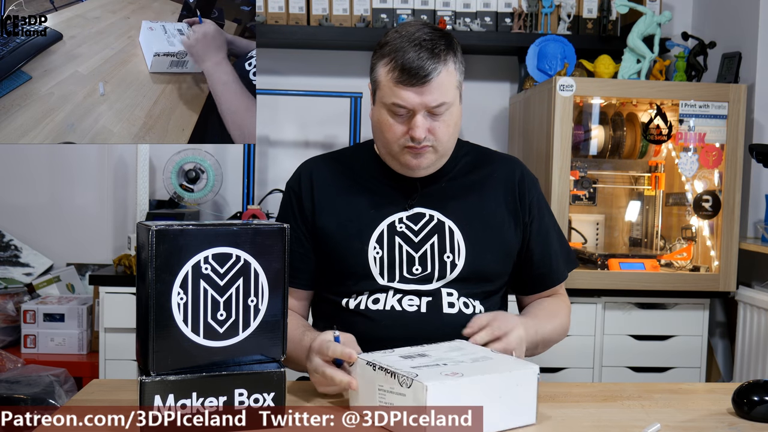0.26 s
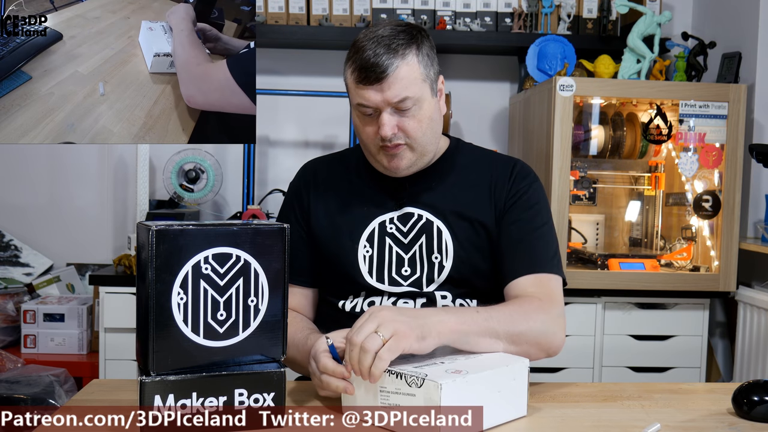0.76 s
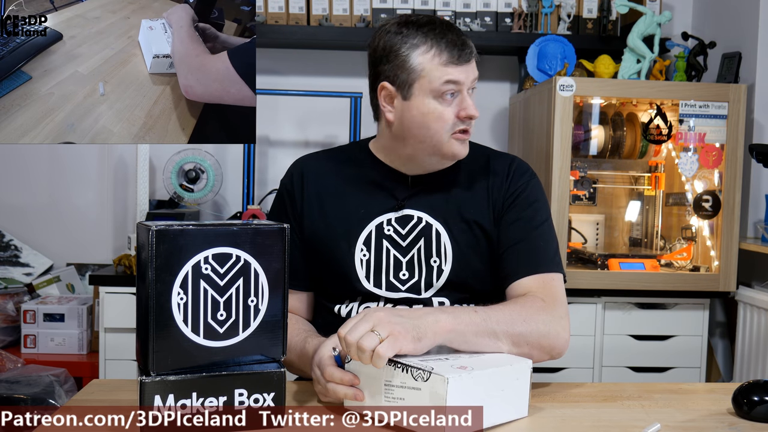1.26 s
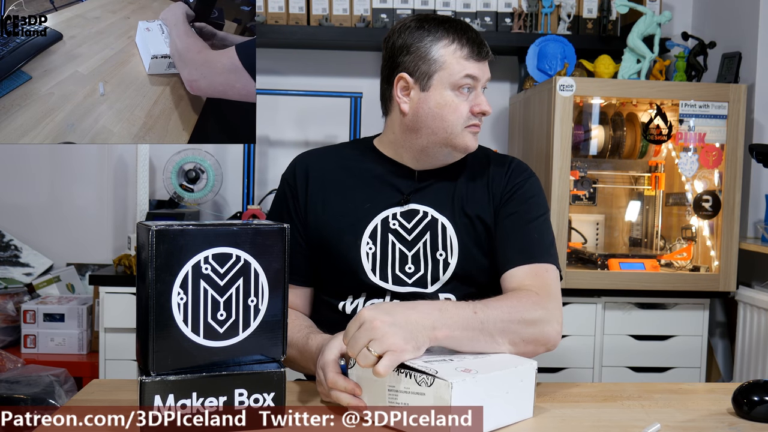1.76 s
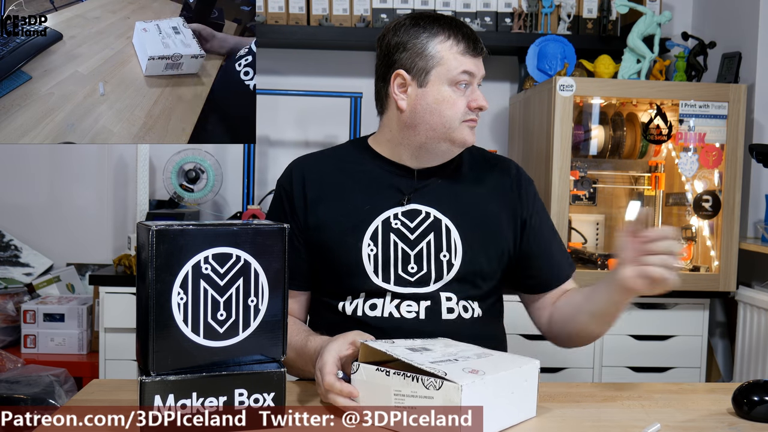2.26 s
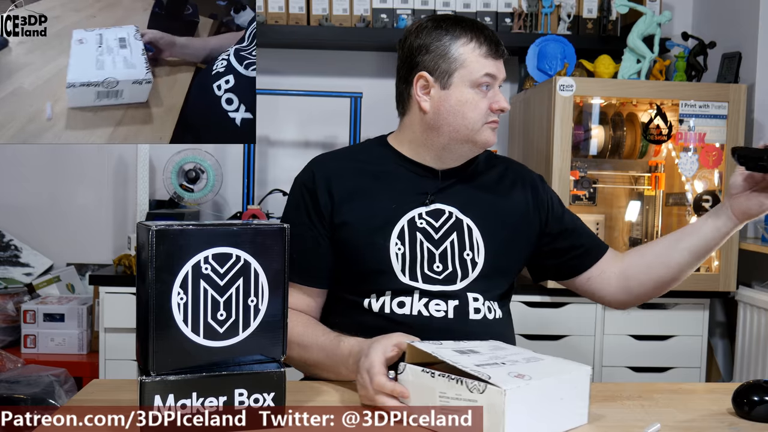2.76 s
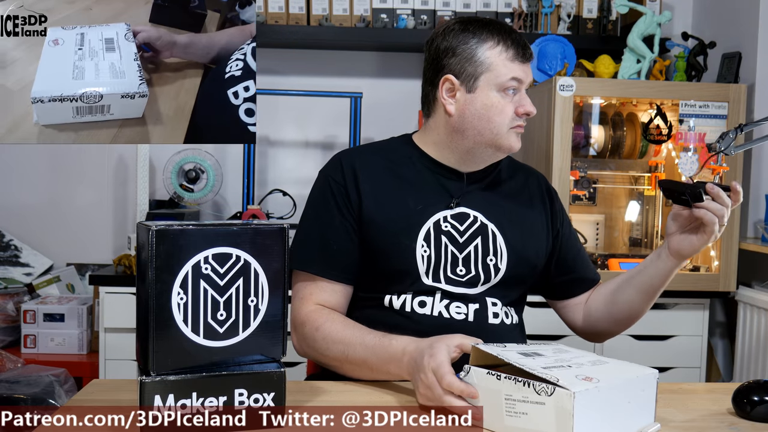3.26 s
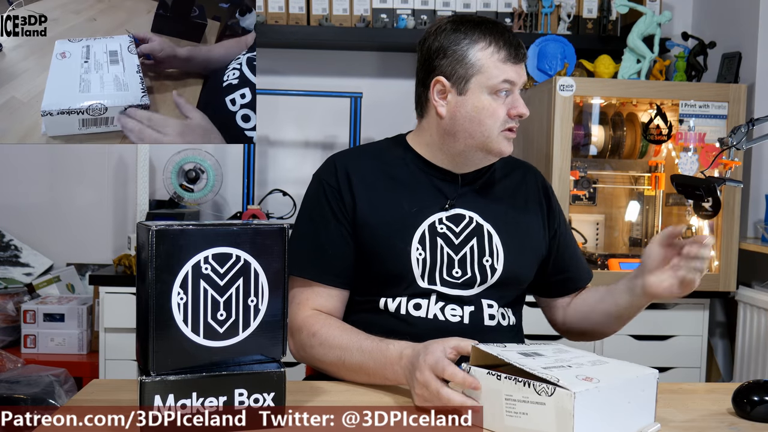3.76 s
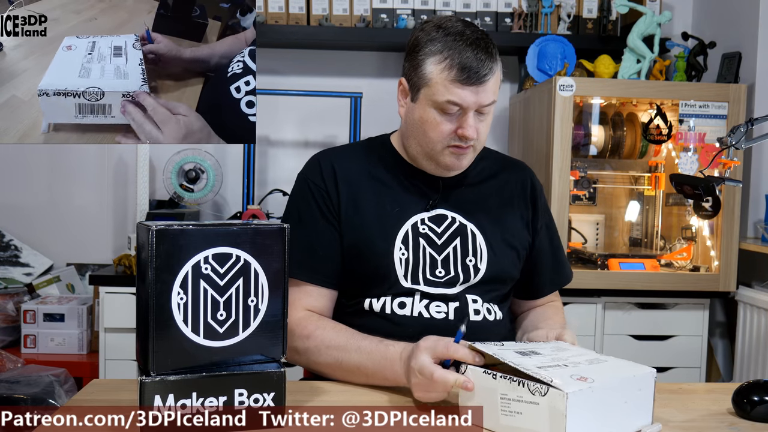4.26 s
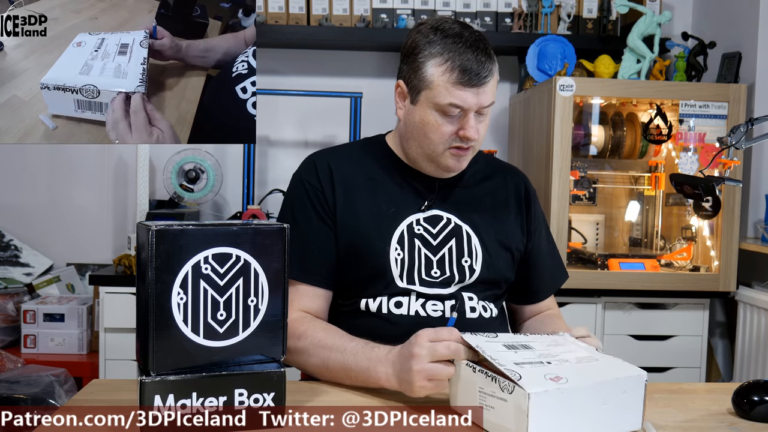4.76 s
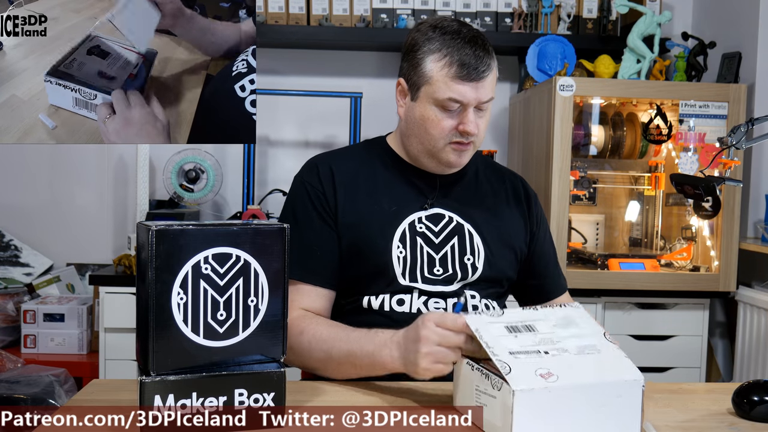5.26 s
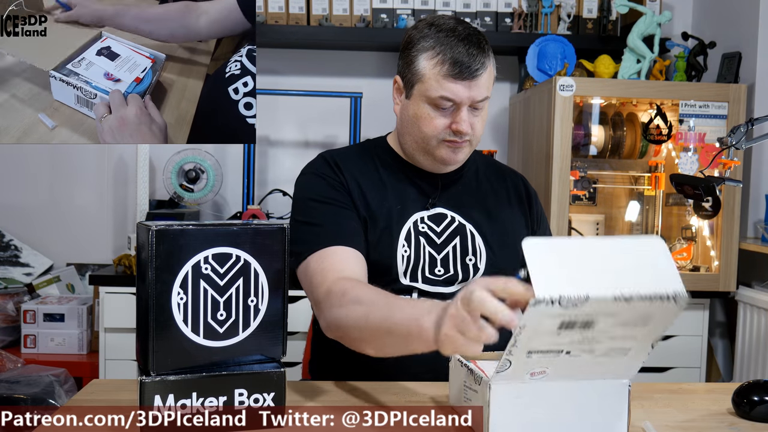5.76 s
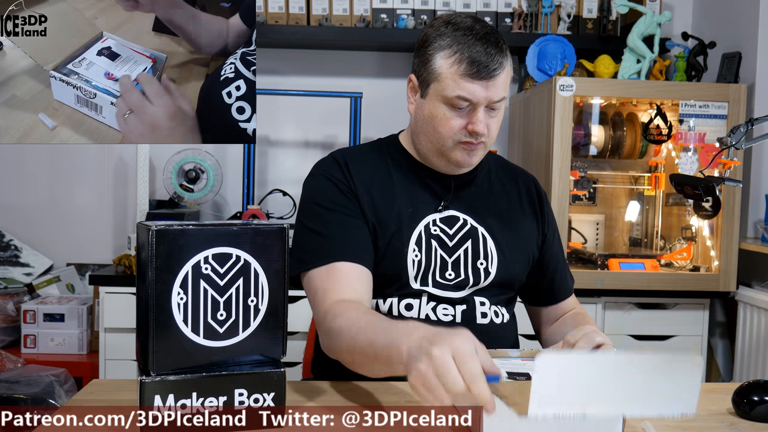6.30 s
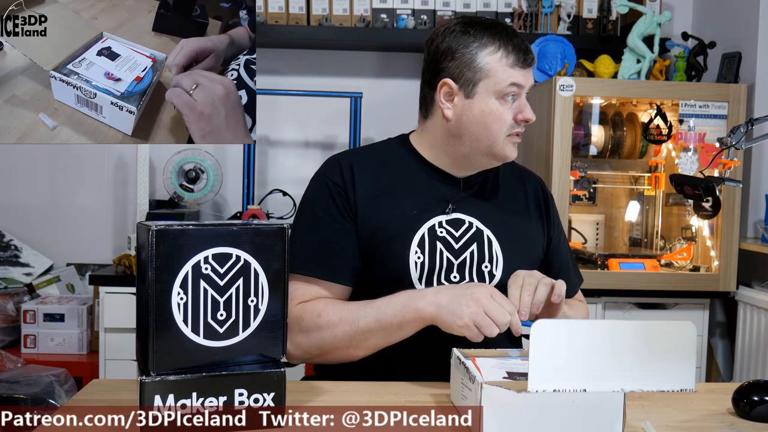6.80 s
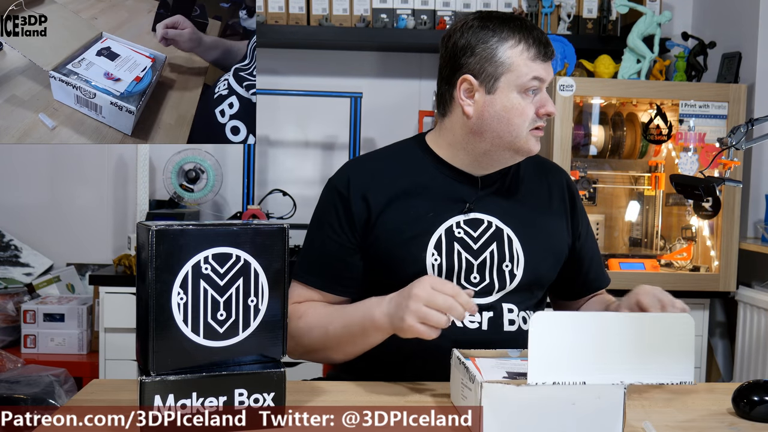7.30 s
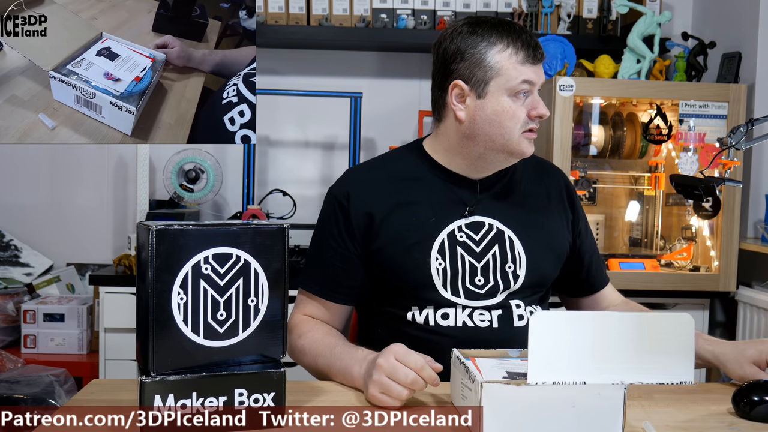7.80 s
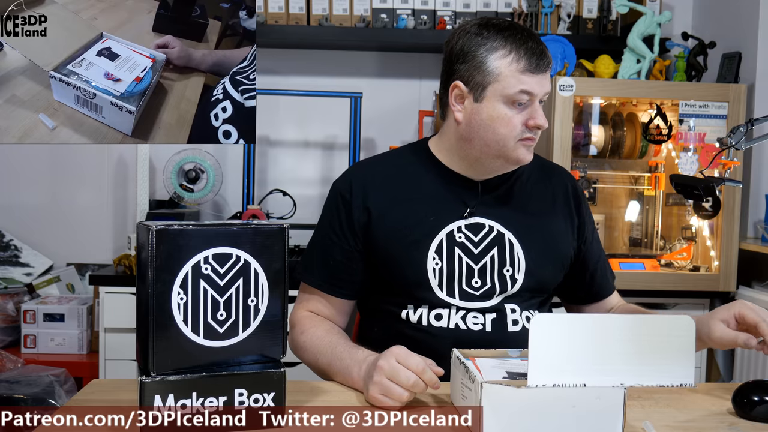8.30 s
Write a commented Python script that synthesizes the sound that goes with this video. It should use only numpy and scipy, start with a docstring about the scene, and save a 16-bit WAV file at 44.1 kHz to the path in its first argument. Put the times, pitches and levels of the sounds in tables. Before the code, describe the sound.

Close cardboard rustle and sharp hollow snaps, a quiet pause, a crackling burst of tearing tape and flaps, one heavy knock, then faint scuffs.

```python
"""Opening a small cardboard box

Hands turn a small cardboard box on a wooden bench, tear its tape and pull the flaps open, close to the microphone.
Snaps and knocks are short pushes and bursts of slips ringing a panel, flaps and tape; heavy ones swing the bench top.
Between them board and tape rub and crackle as uneven noise through resonances, with pitched scuffs of a finger.
Low rumble comes through the bench; a small, furnished room adds short echoes and a faint steady hush."""
import sys
import numpy as np
from scipy import signal
from scipy.fft import rfft, irfft
from scipy.io import wavfile
from scipy.ndimage import uniform_filter1d

SR = 44100
rng = np.random.default_rng(int(sys.argv[2]) if len(sys.argv) > 2 else 0)


def wav_out(sig):
    """Save sig, one row per channel (or a flat mono array), as 16-bit PCM at SR to the path in sys.argv[1]."""
    wavfile.write(sys.argv[1], SR, np.round(np.clip(np.atleast_2d(sig).T, -1, 1) * 32767).astype(np.int16))


N = 376613


def undb(db):
    """Level in dB to amplitude."""
    return 10 ** (np.asarray(db) / 20)


def unit(x):
    """Scale to rms 1."""
    return x / np.sqrt(np.mean(x ** 2))


def even(x):
    """Hold the rms at 1 over every tenth of a second or so."""
    return x / np.sqrt(uniform_filter1d(x ** 2, SR // 10) + 1e-12)


def band(x, low_hz, high_hz):
    """Band-pass with steep skirts."""
    return signal.sosfilt(signal.butter(3, [low_hz, high_hz], "band", fs=SR, output="sos"), x)


def ring(x, hz, width_hz):
    """Two-pole resonance, gain 1 at the centre."""
    return signal.lfilter(*signal.iirpeak(hz, hz / width_hz, fs=SR), x)


def walk(rate_hz):
    """Slow random drift: a new level every 1 / rate_hz seconds, smoothed twice and halved."""
    hold = int(SR / rate_hz)
    levels = np.repeat(rng.standard_normal(N // hold + 1), hold)
    smooth = uniform_filter1d(uniform_filter1d(levels, hold), hold)
    return 0.5 * smooth[:N]


def body(x, modes, patchiness, rate_hz):
    """Sum of steep resonances, each swelling and fading on its own by patchiness; rms 1."""
    total = 0
    for k, (hz, width_hz, db) in enumerate(modes):
        sign = (-1) ** k  # neighbours in opposite sign
        mode = ring(ring(x, hz, width_hz), hz, 1.8 * width_hz)
        total = total + sign * undb(db + patchiness * walk(rate_hz)) * mode
    return unit(total)


def slips(size, rate_hz, spread_db):
    """Irregular clicks of fibres and glue letting go, a few much larger than the rest."""
    hit = rng.random(size) < rate_hz / SR
    return hit * rng.standard_normal(size) * undb(spread_db * rng.exponential(size=size))


def rubbing():
    """Stick-slip of board on board and peeling glue: one uneven grip shakes every part."""
    # one table per movement of the hands, levels before the gain for jerkiness: (time [s], board level [dB],
    # rubbed panel pitch [Hz], flap level [dB], scrape level [dB], tape level [dB])
    movements = [
        [(0.0, -47.5, 457, -48.5, -55, -63.5), (0.062, -41.5, 338, -48.5, -51.5, -51.5),
         (0.234, -55.5, 342, -57.5, -60, -69), (0.264, -57.5, 521, -63.5, -68.5, -73),
         (0.462, -58, 273, -69, -78, -82), (0.598, -54, 403, -60, -74, -62.5),
         (0.768, -54, 476, -52.5, -56.5, -64), (0.86, -65, 392, -65, -66, -72)],
        [(0.86, -49, 312, -56, -68, -74), (0.898, -41, 272, -46, -52, -66), (0.984, -58, 288, -60, -70, -70),
         (1.024, -46, 397, -51, -57, -63), (1.086, -48, 380, -48, -63, -67), (1.12, -53, 333, -57, -59.5, -68),
         (1.16, -49, 355, -51, -68, -71), (1.215, -40, 319, -47.5, -56, -63.5)],
        [(1.215, -46, 276, -49.5, -69, -54), (1.307, -36, 304, -47, -49.5, -58.5),
         (1.407, -37.5, 405, -44, -51, -55), (1.467, -37.5, 453, -47.5, -57, -62),
         (1.539, -34.5, 516, -46.5, -58, -56.5), (1.587, -36, 507, -40, -58.5, -59.5),
         (1.64, -45, 411, -51.5, -55, -59)],
        [(1.64, -50, 394, -47.5, -73, -64), (1.696, -54, 308, -58, -71, -72), (1.776, -48, 308, -56, -59, -65),
         (1.824, -49, 446, -51, -52, -51), (2.006, -66, 422, -67, -76, -78), (2.156, -59, 319, -67, -72, -75),
         (2.24, -62.5, 412, -64, -71, -75.5), (2.3, -66, 312, -65, -71, -79)],
        [(2.3, -68, 352, -70, -76, -82), (2.466, -58, 474.4, -64, -58, -73), (2.606, -57, 374, -57, -52.5, -69),
         (2.622, -56, 433, -55, -55, -70), (2.678, -51.5, 356, -53, -54, -66),
         (2.802, -51.5, 452, -55, -52.5, -62), (2.864, -46.5, 334, -53, -56, -66),
         (2.9, -55, 474, -56, -50, -61)],
        [(2.9, -46.5, 454, -48, -53, -60), (3.09, -61.5, 395, -70.5, -69.5, -83),
         (3.24, -85, 244, -84, -88, -86), (3.38, -86, 221, -85, -81, -93), (3.44, -79, 704, -76, -83, -87.5),
         (3.516, -86, 252, -82.5, -82, -89), (3.676, -86, 221, -80.5, -80, -88),
         (3.78, -73, 318, -71, -71, -83)],
        [(3.78, -71, 338, -68, -77, -80), (3.9, -55, 592, -55, -71, -72), (3.962, -56, 564, -55, -54, -57),
         (4.046, -50, 337, -56, -66, -61), (4.11, -44, 322, -48, -55, -78),
         (4.244, -46.5, 555, -60, -62.5, -66), (4.312, -40.5, 318, -48.5, -52, -58),
         (4.39, -49, 596, -44, -60, -52.5)],
        [(4.39, -42, 390, -54, -63, -57.5), (4.522, -41, 343, -48.5, -50, -54),
         (4.586, -33, 540, -40, -49, -52), (4.614, -35.5, 411, -45.5, -50, -59),
         (4.784, -39.5, 543, -43, -57, -56.5), (4.81, -28, 371, -41, -48, -53),
         (4.888, -38, 356, -41.5, -50, -41), (4.96, -37, 387, -42.5, -47.5, -61)],
        [(4.96, -36, 332, -44, -49, -43), (5.028, -38.5, 348, -39.5, -45, -38),
         (5.076, -38, 488, -41.5, -45.5, -45), (5.144, -46, 394, -42.5, -47.5, -48),
         (5.172, -43, 472, -42.5, -58, -49), (5.218, -53, 413, -49, -49, -59), (5.25, -53, 454, -51, -60, -47)],
        [(5.25, -47, 450, -48, -50, -41), (5.406, -50, 448, -51.5, -55.5, -57.5),
         (5.486, -51, 757, -48, -51, -55), (5.558, -51, 271, -66, -69.5, -69), (5.638, -58, 271, -66, -69, -77),
         (5.682, -59, 660, -59, -72, -74), (5.798, -54.5, 527, -64, -73, -74),
         (5.85, -73, 304, -60, -70, -69.5)],
        [(5.85, -45, 668, -54.5, -42, -73), (6.056, -51, 621, -53, -64, -65.5),
         (6.338, -69.5, 267, -74.5, -79, -75), (6.52, -83, 225, -84, -90, -83.5),
         (6.622, -76.5, 431, -81, -85.5, -86.5), (6.75, -77, 361, -85, -80, -84),
         (6.778, -74, 702, -83, -82, -86), (6.87, -78, 450, -75, -79, -79)],
        [(6.87, -63, 597, -58, -53, -66), (7.004, -50, 662, -48, -56, -54), (7.088, -59, 781, -47, -47, -53.5),
         (7.15, -50.5, 367, -52, -56.5, -70), (7.244, -51.5, 629, -49, -53.5, -58),
         (7.296, -61.5, 397, -57, -60.5, -73), (7.342, -59, 677, -62, -64.5, -69.5),
         (7.5, -77.5, 301, -73.5, -88, -75)],
        [(7.5, -73, 477, -67.5, -76, -81), (7.58, -66, 579, -60.5, -67, -85),
         (7.742, -55.5, 477, -52, -58.5, -82), (7.788, -53, 609, -49, -62, -75),
         (7.984, -63.5, 729, -64, -74, -85), (8.222, -76.5, 818, -79, -83.5, -87),
         (8.444, -75.5, 477, -84, -90, -88.5), (8.54, -68, 736, -78, -83, -87)],
    ]
    # how jerky each movement is: (jerkiness [0 smooth sliding, about 1 and above tearing])
    jerkiness = [.6, 1.4, 1.3, .4, .3, .26, 0.91, .85, 0.54, 0.42, .72, 0.55, .27]
    # resonances that rubbing excites in the panels of the box: (centre [Hz], width [Hz], relative level [dB])
    panel_modes = [(139.4, 48, -1), (262, 53, 1), (370, 110, -1.5), (506, 160, -3.5), (660, 100, -1.5)]
    # the same for its flaps: (centre [Hz], width [Hz], relative level [dB])
    flap_modes = [(815, 260, 2.5), (1220, 250, -2.5), (1615, 500, -3.5)]
    # scraping board surfaces: (centre [Hz], width [Hz], relative level [dB])
    scrape_modes = [(2050, 520, 5), (2660, 710, 2), (3380, 1200, 1.5), (4070, 3100, -9)]
    # fizzing tape: (centre [Hz], width [Hz], relative level [dB])
    fizz_modes = [(5340, 7900, 0.0041), (7800, 1000, 13)]
    # highest treble of the tape: (centre [Hz], width [Hz], relative level [dB])
    sheen_modes = [(10505, 12000, -1), (13140, 2000, -0.091), (14100, 830, -1)]
    focus_db_per_oct = 8.5  # panel modes fade away from the rubbed panel's pitch
    fizz_share = 0.3  # the fizz level lies this far from tape towards scrape
    # from here on the hands work off to the side, where the highest treble is lost
    aside_s, aside_sheen_db = 6.5, -17
    jerk_gain_db = 3  # jerky movements are louder

    t = np.arange(N) / SR
    s, *columns = np.concatenate(movements).T
    board_db, board_hz, flap_db, scrape_db, tape_db = (np.interp(t, s, c) for c in columns)
    fizz_db = tape_db + fizz_share * (scrape_db - tape_db)
    sheen_db = tape_db - 2 + aside_sheen_db * (t > aside_s)
    rubbed_modes = [(hz, width_hz, db - focus_db_per_oct * np.abs(np.log2(hz / board_hz)))
                    for hz, width_hz, db in panel_modes]

    jerk = np.interp(t, s, np.repeat(jerkiness, [len(table) for table in movements]))
    grip = undb(7 * jerk * walk(35))
    coarse_hiss = 0.15 * (1.2 - jerk) * rng.standard_normal(N)
    coarse = even(grip * (slips(N, 500, spread_db=3.8 * jerk) + coarse_hiss))

    def fine_slips():
        """Dense small slips under the same grip."""
        return even(grip * (slips(N, 4400, spread_db=1.5 * jerk) + 0.21 * rng.standard_normal(N)))

    fibres, glue = fine_slips(), fine_slips()
    panels = even(body(coarse, rubbed_modes, patchiness=2.0, rate_hz=16))
    flap_grit = unit(coarse) + 1.4 * unit(fibres)
    flaps = band(body(flap_grit, flap_modes, patchiness=4.5, rate_hz=23), 320, 2700)
    scrape = band(body(fibres, scrape_modes, patchiness=3.0, rate_hz=15), 1500, 5600)
    fizz = band(body(fibres + glue, fizz_modes, patchiness=8.5, rate_hz=10), 3600, 6500)
    sheen = band(body(glue, sheen_modes, patchiness=0, rate_hz=6.4), 5300, 19845)
    mix = undb(board_db) * panels + undb(flap_db) * flaps + undb(scrape_db) * scrape
    mix = mix + undb(fizz_db) * fizz + undb(sheen_db) * sheen
    return undb(jerk_gain_db * jerk) * mix


def rumble():
    """Low shaking that reaches the microphone through bench and body: noise through low resonances."""
    # strength of the shaking: (time [s], level [dB])
    shaking = [(0.0, -48), (1.14, -60), (1.21, -36.5), (1.4, -57), (1.85, -48.5), (2.5, -71.5),
               (2.71, -57.5), (4.38, -46), (4.8, -52.5), (4.85, -34.5), (5.54, -55), (5.56, -43),
               (5.78, -67), (5.85, -40.5), (5.99, -48.5), (7.06, -64.5), (7.14, -49.5), (8.54, -68.5)]
    # low resonances of the bench: (centre [Hz], width [Hz], relative level [dB])
    bench_modes = [(36.6, 32, -0.5), (61, 59, -3.5), (81.5, 10, -9)]
    s, db = np.array(shaking).T
    level = undb(np.interp(np.arange(N) / SR, s, db))
    return level * body(rng.standard_normal(N), bench_modes, patchiness=5.0, rate_hz=9.6)


def hush():
    """The faint steady noise of the room: white noise shaped in frequency."""
    # spectrum of the noise: (frequency [Hz], relative density [dB per Hz])
    spectrum = [(59, -28), (100, -3.5), (229, -16.5), (461, -1.5), (1010, -19), (1170, -6), (1580, -14),
                (11400, -24), (16000, -61.5)]
    level_db = -79.5  # rms
    knot_hz, knot_db = np.array(spectrum).T
    hz = np.maximum(np.fft.rfftfreq(N, 1 / SR), 1)
    shape_db = np.interp(np.log(hz), np.log(knot_hz), knot_db)
    noise = irfft(rfft(rng.standard_normal(N)) * undb(shape_db), N)
    return undb(level_db) * unit(noise)


def snaps():
    """A tear is a short run of slips; its push rings a panel, its slips ring flaps and tape. Returns direct, room feed."""
    # snaps and knocks, part levels relative to the snap level: (time [s], snap level [dB], panel pitch [Hz],
    # panel level [dB], edge pitch [Hz], flap level [dB], crack level [dB], tape fizz level [dB],
    # tearing time [ms], tape sheen level [dB])
    snap_list = [(0.04, -30, 382, -5.5, 1110, -20, -42, -26, 3.1, -27),
                 (0.086, -23.5, 237, -9, 790, -14.5, -30, -27, 5.2, -30),
                 (0.12, -26, 153, -13.5, 890, -15.5, -15, -15, 2.2, -19),
                 (0.156, -30.5, 331, -10, 840, -15, -26, -22, 2.8, -37),
                 (0.3, -32.5, 441, -4.5, 920, -18.5, -34, -46, 2.3, -52),
                 (0.457, -20, 256, -6, 826, -24.5, -46, -49.5, 2.7, -50),
                 (0.518, -33.5, 261, -3.5, 870, -21, -33, -37, 3.3, -34),
                 (0.572, -33, 519, -8.5, 800, -25.5, -38, -48, 3.3, -32),
                 (0.65, -35, 522, -9.5, 870, -17, -22, -25, 5.8, -21),
                 (0.737, -37.5, 541, -10.5, 856, -11.5, -17.5, -34, 4.2, -35),
                 (0.864, -28, 673, -7, 880, -8.5, -20.5, -37.5, 2.8, -38),
                 (0.906, -10, 250, -4, 850, -27.5, -33, -39.5, 3.6, -35),
                 (0.967, -34.5, 307, -9.5, 1280, -7.5, -20.5, -31, 2.3, -27),
                 (1.05, -26.5, 280, -13.5, 875, -14.5, -18, -37, 2.6, -30.5),
                 (1.058, -21, 380, -8, 890, -16.5, -21.5, -30.5, 2.3, -33.5),
                 (1.173, -32, 388, -2, 1280, -16, -31.5, -42, 3.2, -43),
                 (1.218, 0, 245, -3.5, 760, -21, -22.5, -26.5, 3.5, -28.5),
                 (1.246, -13, 463, -10.5, 1150, -19.5, -19.5, -21, 2.6, -24),
                 (1.32, -21.5, 291, -8.5, 890, -15.5, -25.5, -31, 3.2, -33.5),
                 (1.352, -24, 345, -4, 845, -19.5, -18, -25.5, 3.9, -28.5),
                 (1.51, -12, 536, -23, 2290, -19, -9, -25.5, 3.9, -40),
                 (1.599, -11, 692, -19.5, 2100, -19.5, -16, -23, 2.5, -21),
                 (1.758, -34.5, 307, -3.5, 1870, -15, -16.5, -26, 5, -28),
                 (1.827, -21, 347, -11.5, 1750, -10.5, -21, -29.5, 3.57, -32),
                 (1.852, -28, 347, -17, 864, -16, -21, -20.5, 2.7, -20.5),
                 (1.956, -15.5, 452, -14, 1030, -19, -20.5, -24, 2.7, -25.5),
                 (2.134, -26.5, 240, -10, 1200, -16, -30, -41, 2.7, -48),
                 (2.342, -41, 366, -9, 1150, -16, -32, -39, 3.6, -39),
                 (2.635, -32.5, 468, -15.5, 1180, -11, -19, -32, 6.1, -37),
                 (2.902, -18.5, 479, -21, 1190, -15.5, -20, -25.5, 2.5, -21.5),
                 (3.436, -51.5, 767, -10, 797, -5.5, -32, -38, 3.6, -40),
                 (3.782, -25, 369, -8.5, 918, -15, -25, -35, 3.9, -34),
                 (3.945, -23.5, 490, -9, 960, -6.5, -16, -18, 3.2, -21),
                 (4, -32, 711, -16, 960, -10.5, -18, -20.5, 4.5, -20),
                 (4.072, -9.5, 283, -12.5, 980, -14, -18, -21, 2.6, -20),
                 (4.166, -21, 428, -10.5, 790, -17, -30, -37.5, 3.9, -42),
                 (4.242, -24.5, 600, -12.5, 990, -14, -28, -33.5, 3.6, -31),
                 (4.314, -25.5, 250, -10, 860, -11, -21.5, -25, 2.6, -19),
                 (4.393, -2.5, 377, -3, 816, -23.5, -25.5, -42, 2.9, -46.5),
                 (4.445, -17, 361, -6, 1030, -20, -31.5, -40.5, 2.4, -44),
                 (4.572, -16.5, 379.9, -15, 945, -17, -16.5, -22, 2.8, -18),
                 (4.579, -11.5, 799, -21.5, 970, -11, -19, -21, 4.3, -18.5),
                 (4.629, -19, 261, -9, 805, -9, -21.5, -19, 4.4, -18),
                 (4.728, -22, 452, -15.5, 840, -11.5, -25, -32.5, 5.5, -36.5),
                 (4.783, -17, 616, -9, 820, -14.5, -26, -34, 3, -38.5),
                 (4.834, -4.5, 358, -8.5, 1080, -11.5, -24, -23, 3.6, -24),
                 (4.85, -5.5, 385, -6.5, 1050, -16.5, -17, -26.5, 5, -28),
                 (4.998, -22.5, 336, -7.5, 940, -14.5, -23, -18.5, 6.8, -23.5),
                 (5.087, -10, 258, -18, 2950, -12.5, -17.5, -20, 4.5, -23),
                 (5.104, -0.5, 595, -19, 1130, -16, -11, -26, 2.6, -25),
                 (5.107, -1, 210.3, -15, 3030, -15, -15.5, -21.5, 2.3, -24.5),
                 (5.159, -21, 218, -18.5, 1140, -16.5, -18.5, -14.5, 3, -14.5),
                 (5.251, -13.5, 479, -18, 3280, -27.5, -15, -24, 3.6, -20.5),
                 (5.273, -21.5, 280, -13.5, 3260, -15, -12.5, -14, 3.6, -23),
                 (5.293, -22.5, 499, -16.5, 3100, -18, -15, -21, 2.5, -24),
                 (5.355, -18.5, 436, -9.5, 1240, -22, -27.5, -38.5, 2.5, -34),
                 (5.43, -28, 369, -8.5, 810, -7, -17, -17.5, 9.9, -15),
                 (5.46, -21, 751, -21.5, 1010, -8.5, -16, -16.5, 3.1, -23),
                 (5.523, -29.5, 431, -10.5, 974, -18, -16, -27.5, 2.9, -23.5),
                 (5.548, -31, 654, -3, 807, -12, -28.5, -27.5, 3.1, -27),
                 (5.567, -21, 151, -5.5, 899, -16.5, -36.5, -30, 3.6, -27.5),
                 (5.856, 1, 724, -8, 793, -11.5, -30, -36, 4, -42),
                 (6.082, -34, 598, -21, 810, -21, -16.5, -15.5, 2.3, -25),
                 (6.126, -28, 170, -29, 2860, -29, -23, -16.5, 3, -15),
                 (6.141, -23.5, 608, -19, 2750, -25, -19.5, -19, 3.1, -20),
                 (6.168, -34.5, 164, -6.5, 1177, -16, -35.5, -37.5, 3.6, -35),
                 (6.279, -40, 151, -4, 802, -15, -38, -34, 3.56, -42),
                 (6.617, -54.5, 423, -7, 1270, -27, -30, -32, 3.6, -35),
                 (6.668, -43, 151, -23, 2080, -39, -8.5, -44, 3.6, -46),
                 (6.683, -48.5, 452, -10, 2680, -32, -12.5, -36, 3.6, -38),
                 (6.782, -41, 506, -24, 1250, -11, -26, -46, 3.6, -50),
                 (6.879, -38, 466, -8.5, 880, -3.5, -7.5, -13, 4.6, -42),
                 (7.005, -22.5, 786, -19.5, 1820, -8.5, -20, -31, 3.6, -52),
                 (7.037, -32, 762, -14, 1800, -4.5, -13, -23, 5.9, -42),
                 (7.214, -41, 530, -13, 1450, -3.5, -8, -17.5, 4.4, -44),
                 (7.656, -33.5, 493, -12, 1240, -9.5, -18, -45, 4.4, -51),
                 (7.795, -18, 646, -22.5, 1880, -9.5, -17.5, -49, 2.9, -57),
                 (7.809, -29, 665, -12.5, 1780, -6, -43, -44, 3.5, -54),
                 (8.411, -54, 616, 1, 1270, -20, -51, -40, 3.6, -44)]
    # the edge that lets go tunes the flap if it is low, the crack if it is high; the other keeps its usual pitch
    edge_split_hz, usual_flap_hz, usual_crack_hz = 1900, 1080, 2661
    build = 0.85  # build-up time / tearing time
    panel_t60_s = 0.023
    panel_width_hz = np.log(1000) / (np.pi * panel_t60_s)
    # extra level into the room: faint snaps sound wetter, sharp cracks drier
    base_wet_db, wet_db_per_db, dry_db_per_db = -8.5, -0.04, 0.2333

    size = 4096
    out, t = np.zeros((2, N + size)), np.arange(size) / SR
    for s, top_db, hz, panel_db, edge_hz, flap_db, crack_db, fizz_db, tear_ms, sheen_db in snap_list:
        flap_hz, crack_hz = usual_flap_hz, usual_crack_hz
        if edge_hz < edge_split_hz:
            flap_hz = edge_hz
        else:
            crack_hz = edge_hz
        wet_db = base_wet_db + wet_db_per_db * top_db - dry_db_per_db * crack_db

        tear_s = tear_ms / 1000
        rise_s = build * tear_s
        onset = np.sin(np.pi / 2 * np.clip(t / rise_s, 0, 1)) ** 2
        force = onset * np.exp(-(np.maximum(t - rise_s, 0) / tear_s) ** 0.76)
        grit = force * (slips(size, 5500, spread_db=4.0) + 0.5 * rng.standard_normal(size))
        # half a cycle of the panel's pitch, roughened by the tear
        push = np.sin(np.pi * np.clip(t * hz * 2, 0, 1)) + 0.13 * force * rng.standard_normal(size)

        panel = ring(push, hz, panel_width_hz) + 0.32 * ring(push, 2.0 * hz, 4 * panel_width_hz)
        panel = band(panel, 0.36 * hz, 2.0 * hz)
        flap = band(grit, 0.56 * flap_hz, 1.604 * flap_hz)
        crack = band(grit, 0.64 * crack_hz, 1.485 * crack_hz)
        fizz, sheen = band(grit, 4800, 9000), band(grit, 9500, 17000)

        # close by the nearest face colours the snap; the room hears all faces, so a broader sound
        near_flap, near_crack = ring(flap, flap_hz, 0.59 * flap_hz), ring(crack, crack_hz, 0.48 * crack_hz)
        near = panel, near_flap, near_crack, fizz, sheen
        far = band(push, 0.5 * hz, 1.7 * hz), flap, crack, fizz, sheen
        head = int((0.006 + rise_s) * SR)  # levels are rms over this opening stretch
        at = int(s * SR)
        part_levels = panel_db, flap_db, crack_db, fizz_db, sheen_db
        for k, (parts, feed_db) in enumerate(((near, 0), (far, wet_db))):
            for part, part_db in zip(parts, part_levels):
                gain = undb(top_db + part_db + feed_db) / np.sqrt(np.mean(part[:head] ** 2))
                out[k, at:at + size] += gain * part
    return out[:, :N]


def room(x):
    """Dense echoes that start a few ms late and ring longest in the bass: decaying noise in bands."""
    # bands of the echoes: (centre [Hz], time to fall 60 dB [s], relative level [dB])
    echo_bands = [(141, 0.84, -23.5), (313, 0.28, -10.5), (680, 0.22, -9.5), (1645, 0.18, -10.5),
                  (2960, 0.23, -18), (7000, 0.35, -11.5), (13000, 0.12, -14)]
    t = np.arange(SR) / SR
    onset = np.clip((t - 0.004) / 0.0033, 0, 1)
    tail = 0
    for hz, t60_s, db in echo_bands:
        echoes = ring(rng.standard_normal(SR), hz, 0.8 * hz) * onset * undb(-60 * t / t60_s)
        tail = tail + undb(db) * echoes / np.sqrt(np.sum(echoes ** 2) * SR / (5.4 * hz))
    return signal.fftconvolve(x, tail)[:N]


def thuds():
    """Heavy pushes set the bench top swinging: a decaying sine that swells in within a cycle."""
    # pushes, level before the swell and decay: (time [s], level [dB], pitch [Hz], time to fall 60 dB [s])
    pushes = [(0.092, -36, 183, 0.18), (0.907, -25.5, 230, 0.034), (1.22, -9.5, 238, 0.048),
              (4.073, -28.5, 189, 0.21), (4.397, -22.5, 235, 0.056), (4.632, -25, 130.3, 0.2),
              (4.838, -25, 235, 0.19), (4.995, -27, 155, 0.2), (5.09, -15, 123.8, 0.044),
              (5.11, -10, 204, 0.034), (5.354, -24.5, 108, 0.048), (5.569, -21.5, 140, 0.12),
              (5.858, -9, 171, 0.056), (7.147, -41, 135, 0.14)]
    size = 16384
    out, t = np.zeros(N + size), np.arange(size) / SR
    for s, db, hz, t60_s in pushes:
        swell = 1 - np.exp(-t * hz * 4.5)
        at = int(s * SR)
        out[at:at + size] += undb(db - 60 * t / t60_s) * swell * np.sin(2 * np.pi * hz * t)
    return out[:N]


def scuffs():
    """Faint pitched scuffs of a finger on an edge: short gritty strokes ring one narrow resonance."""
    # strokes: (time [s], approximate peak level [dB], pitch [Hz], length [ms])
    strokes = [(0.659, -38, 738, 29), (0.738, -42, 837, 27), (3.159, -63, 2690, 35), (3.199, -61, 2414, 33),
               (3.321, -62, 2460, 33), (3.399, -64, 2870, 35), (3.437, -51, 773, 31),
               (3.509, -52, 1107, 27), (3.574, -56.5, 1130, 35), (3.707, -48, 1170, 35),
               (3.744, -46, 1150, 28), (6.785, -41, 1260, 25), (7.549, -49, 1210, 35),
               (7.899, -43, 1200, 29), (8.034, -44.5, 786, 35), (8.146, -43, 826, 35),
               (8.219, -54, 819, 34), (8.414, -55.5, 1270, 35)]
    width_ratio = 0.15  # resonance width / pitch
    crest_db = 10  # assumed peak over rms
    size = 8192
    out, t = np.zeros(N + size), np.arange(size) / SR
    for s, db, hz, ms in strokes:
        stroke = np.clip(t / 0.004, 0, 1) * np.exp(-(t * 1000 / ms) ** 2)
        grit = slips(size, 900, spread_db=2.5) + 0.085 * rng.standard_normal(size)
        tone = unit(ring(ring(grit, hz, width_ratio * hz), hz, 2 * width_ratio * hz))
        at = int(s * SR)
        out[at:at + size] += undb(db - crest_db) * stroke * tone
    return out[:N]


def scene():
    """Close sounds, their echoes in the room, and the rubbing, rumble and hush, in mono."""
    near, far = snaps()
    bench, fingers = thuds(), scuffs()
    echoes = room(far + bench + fingers)
    return (rubbing() + rumble() + hush() + near + echoes + bench + fingers)[None]


def record(dry):
    """The microphone signal is clipped at 0.85 of full scale, then a steep low-pass cuts the top."""
    top_hz = 15900
    low_pass = signal.ellip(10, 0.2, 90, top_hz, fs=SR, output="sos")
    return signal.sosfilt(low_pass, np.clip(dry, -0.85, 0.85))


dry = scene()
out = record(dry)
wav_out(out)
```